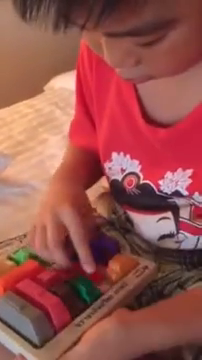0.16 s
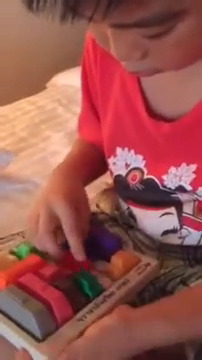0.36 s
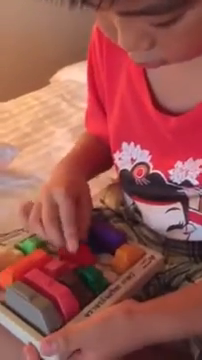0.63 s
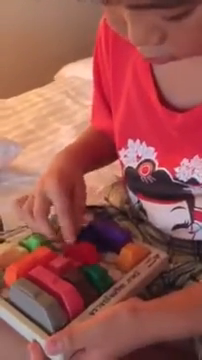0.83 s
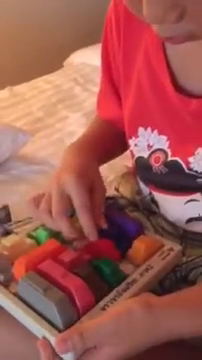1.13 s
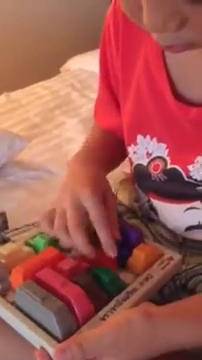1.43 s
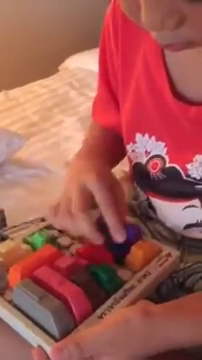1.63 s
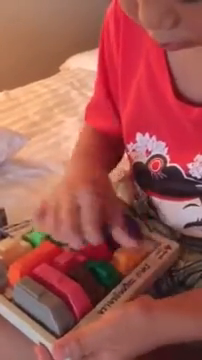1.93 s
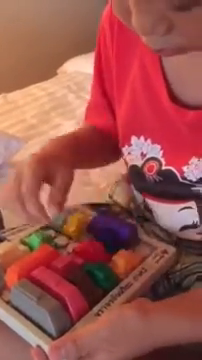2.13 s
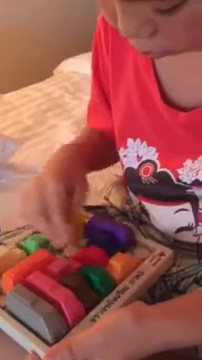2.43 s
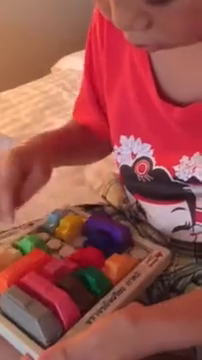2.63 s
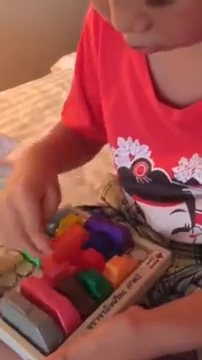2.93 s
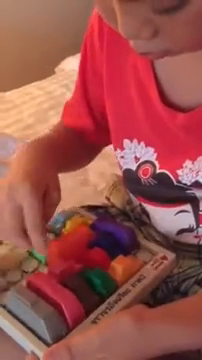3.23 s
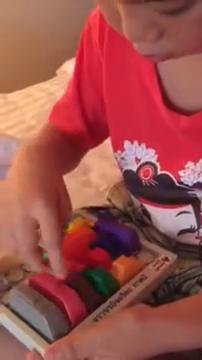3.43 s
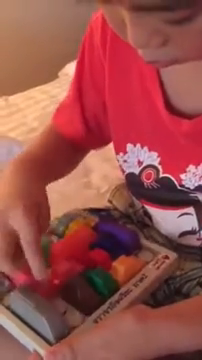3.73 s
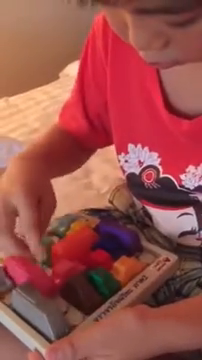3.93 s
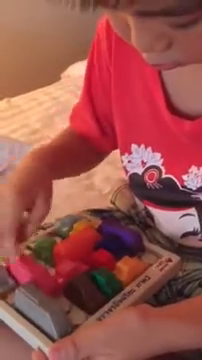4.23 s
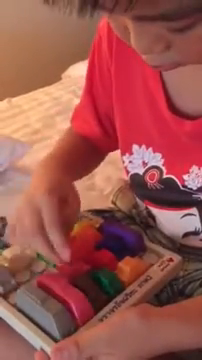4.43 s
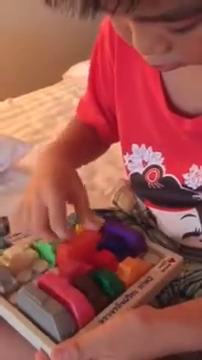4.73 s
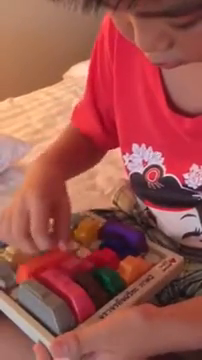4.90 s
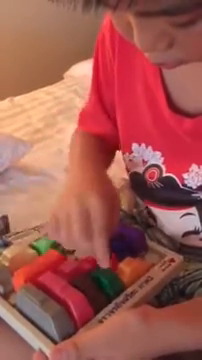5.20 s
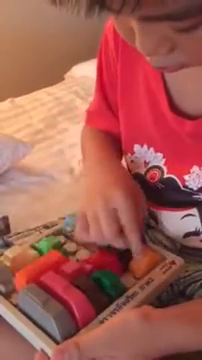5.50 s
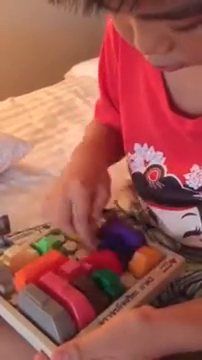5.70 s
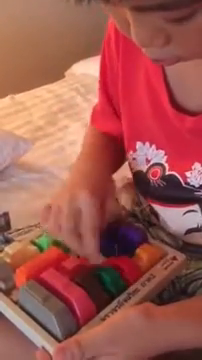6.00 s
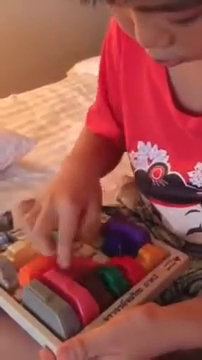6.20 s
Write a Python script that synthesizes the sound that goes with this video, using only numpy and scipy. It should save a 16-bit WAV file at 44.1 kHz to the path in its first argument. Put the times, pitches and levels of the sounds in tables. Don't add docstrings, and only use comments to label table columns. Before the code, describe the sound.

Plastic puzzle pieces rub and tap against one another and their plastic tray, quiet at first, then in sharp double and triple clacks around two, three and four seconds, with more busy rattling near five. Close phone pickup, small bedroom with brief echo. A muffled engine drone wavers late and rises in pitch, beside steady soft air-conditioner noise.

```python
import sys
import numpy as np
from scipy import signal
from scipy.fft import rfft, irfft
from scipy.io import wavfile
from scipy.ndimage import uniform_filter1d

SR = 44100
rng = np.random.default_rng(int(sys.argv[2]) if len(sys.argv) > 2 else 0)


def pcm_store(signal):
    levels = np.round(np.clip(np.atleast_2d(signal), -1, 1) * 32767)
    wavfile.write(sys.argv[1], SR, levels.astype(np.int16).T)


def magnitude_from_level(level_db):
    exponent = np.asarray(level_db, float) / 20
    return 10 ** exponent


N = 280035

# f/Hz, level/dB
MOTOR_LINES = [(95.5, -48.5)]
# f/Hz, level per Hz/dB
AIR_SPECTRUM = [(120, -26), (200, -6.5), (350, -14.5), (550, -18.5), (1000, -18), (2000, -21),
                (3200, -32.5), (5000, -34.5), (10000, -40.5), (14500, -42), (16000, -56.5)]
AIR_DB = -63.5

# t/s, firing rate/Hz, load/dB
ENGINE_COURSE = [(0, 51.41, 0.5), (1.1, 52.93, 2), (1.45, 54.21, 0), (1.68, 55.27, 4), (1.85, 57.32, -6.5),
                 (2.3, 57.86, 1.5), (3.3, 57.68, -3), (4.16, 57.16, -0.5), (4.25, 55.98, -16),
                 (4.68, 38.25, -1), (4.85, 44.78, -3.5), (4.98, 40.55, -2.5), (5.12, 49.83, 2.5),
                 (5.32, 41.98, -2.5), (5.48, 52.36, 1.5), (5.72, 53.26, 3), (5.86, 58.72, 1),
                 (6.16, 58.5, 2), (6.23, 65.1, -4.5)]
# t/s, depth/dB, width/s
CLUTCH_LULLS = [
    (4.579, -18.5, 0.13),
    (4.91, -12, 0.066),
    (5.08, -5.5, 0.043),
    (5.29, -13, 0.078),
    (5.67, -4.5, 0.059),
]
# f/Hz, level/dB
WALL_TRANSMISSION = [(42, -58.5), (52, -60), (58, -48.5), (85, -35), (104, -45), (116, -33.5), (152, -41.5),
                     (173, -56)]
# order/quarters of the firing rate, level/dB
CYLINDER_LINES = [(5, -5.5), (6, -4), (7, -1.5), (9, -6), (10, -4.5), (11, -2), (14, -12), (16, -19)]
UNEVEN_DB, UNEVEN_PER_DB, UNEVEN_PER_HZ = -52.5, 0.5, -0.18
# f/Hz, level per Hz/dB
RUMBLE_SPECTRUM = [(20, -17), (40, -8.5), (65, -13.5), (100, -5), (160, 5.5), (210, -6.5), (300, -26),
                   (450, -55.5)]
RUMBLE_DB = -49
# t/s, level/dB
TYRE_ROAR = [
    (0, -72),
    (.45, -82),
    (.7, -77.5),
    (5.8, -75.5),
    (6.1, -67),
    (6.35, -53),
]

# f/Hz, t60/s
ROOM_DECAY = [(500, 0.26), (1000, 0.45), (2000, 0.47), (4000, 0.32), (8000, 0.27), (13000, 0.16)]
ROOM_DB = -10
SCATTER_PER_S, STRAIGHT = 900, 0.38

# f/Hz, t60/s, level/dB
TRAY_MODES = [(1141.7, 0.0037, 5), (1446, 0.0083, -3.5), (1830, 0.038, -10.5), (2050, 0.11, 0.5),
              (2350, 0.031, -8), (2876, 0.031, -4.5), (3550, 0.0052, -6.5), (4140, 0.0087, -2),
              (4470, 0.08, 2.5)]
# f/Hz, level per Hz/dB
CONTACT_SPECTRUM = [(150, -52.5), (260, -40), (750, -25.5), (1100, -2.5), (1700, -2.5), (2500, 5.5),
                    (4200, 2), (5200, -0.5), (8000, -7), (13700, -10), (16000, -14.5)]
# t/s, peak level/dB, brightness/dB, 20 dB swell/s, 20 dB fade/s
SLIDE_STROKES = [(.025, -48.5, 0, 0.062, 0.23), (.2, -55.5, 8.5, 0.31, 0.36), (.34, -47.5, 3, 0.12, 0.12),
                 (.5, -64.5, 9.5, 0.25, 0.15), (.72, -62, 8, 0.15, 0.048), (1.02, -56.5, 3, 0.11, 0.11),
                 (1.52, -71, -9, 0.17, .35), (1.999, -69.5, 6, 0.29, .22), (2.48, -61.5, -0.5, .1, 0.11),
                 (3.821, -57.5, -2, 0.24, 0.098), (4.66, -70, -4, .3, .2), (4.97, -55.5, -2.5, 0.28, 0.2),
                 (5.09, -59, 1, 0.14, 0.072), (5.62, -80, -3, .18, 0.18), (6.04, -61, -12, .3, 0.036),
                 (6.33, -66, 0, 0.24, .2)]

# t/s, peak level/dB, hollow note f/Hz, rise/ms, fall/ms
HARD_SET_DOWNS = [(1.9006, -26.5, 2768, 1.9, 5.1), (1.919, -24.5, 2330, 1.2, 2.3),
                  (1.9502, -27, 2795, 5, 5.3), (1.955, -16, 2598, .4, 3.9),
                  (2.3787, -18.5, 4060, 0.26, 6.3), (2.3884, -14.5, 2305, 2.1, 2.2),
                  (2.8997, -19.5, 1630, 1.1, 2.3), (2.9449, -16, 1830, 4.3, 6.5),
                  (2.9576, -23.5, 1807, 3.4, 8.5), (2.9842, -20, 2555, 2.5, 4),
                  (3.0068, -6.5, 2000, 1.4, 1.4), (3.7231, -17.5, 2210, 0.78, 9),
                  (3.7294, -25.5, 1890, 5.5, 1.4), (3.7389, -25, 2156, 4.6, 5.9),
                  (3.7482, -24.5, 2150, 5.3, 1.9), (3.7565, -12.5, 1905, .67, 6.4),
                  (4.3175, -18, 2350, 3, 6.9), (4.3639, -20, 2007, 1.1, 11), (4.4027, -8.5, 3980, 1.7, 1.3),
                  (4.8899, -16.5, 3140, 0.44, 6.9), (4.938, -21.5, 2470, .6, 8.1),
                  (5.463, -19, 2900, 1.3, 3), (5.4952, -20.5, 3180, 0.33, 3.6),
                  (5.4997, -14, 3620, 2.7, 1.8)]
# t/s, peak level/dB, hollow note f/Hz, fall/ms
EDGE_TAPS = [(.0499, -32.5, 2140, 1.8), (.19, -42.5, 2330, 5.6), (.2883, -29.5, 2600, 2.4),
             (.389, -36, 2100, 2.6), (.4384, -44, 2300, 3.2), (.6574, -37, 1260, 2.7),
             (.7184, -40, 2760, 3.1), (.7475, -40.5, 2210, 1.3), (1.2951, -37.5, 2210, 4.1),
             (1.3169, -41, 2800, 2.5), (1.352, -28, 2830, 7.3), (1.412, -34.5, 4450, 2.2),
             (1.6105, -38, 2600, 2.1), (1.8871, -30.5, 3200, 6.1), (2.0731, -40, 2470, 5.6),
             (2.4761, -35, 2620, 3.9), (3.6877, -33, 2620, 3.8), (4.8055, -31, 2240, 2.9),
             (4.8121, -25, 2220, 6), (4.8818, -21.5, 1900, 1.6), (4.918, -26.5, 1900, 2.9),
             (5.146, -32, 2380, 5.6), (5.4126, -31, 2420, 3.7), (5.4234, -27.5, 2640, 3.9),
             (5.4477, -34, 2230, 3.1), (5.643, -37, 4260, 3.4), (5.8885, -24.5, 2980, 5.9),
             (5.9346, -25.5, 2600, 15), (6.1505, -37, 2400, 2.9), (6.2163, -36, 4650, 5.3)]
# t/s, peak level/dB, hollow note f/Hz, fall/ms
GLANCING_SCUFFS = [(0.0207, -40.5, 1660, 6), (.6386, -35.5, 4420, 2), (0.6478, -37, 2060, 1.6),
                   (.6956, -29.5, 3000, 1.6), (.7315, -37.5, 2580, 3.8), (0.9887, -38, 4300, 3.9),
                   (1.3254, -34.5, 2740, 1.6), (1.3758, -29, 4580, 3.1), (1.4888, -39.5, 3020, 2.1),
                   (1.588, -31, 2105, 1.5), (1.6561, -41, 2720, 4), (1.8542, -32.5, 2230, 7.1),
                   (2.0493, -35.5, 2600, 8.9), (2.3677, -35, 3030, 17), (2.9749, -21, 1830, 19),
                   (3.6993, -32, 2270, 19), (3.965, -35.5, 2660, 0.96), (4.3591, -24.5, 2020, 0.52),
                   (4.3784, -27.5, 2500, 5.1), (4.42, -24, 2300, 17), (4.8641, -32.5, 2460, 8.8),
                   (4.903, -30, 2850, 4.4), (4.959, -25.5, 3670, 1.2), (5.3189, -42.5, 2680, 8.3),
                   (5.6695, -43.5, 2800, 1), (5.883, -35, 3000, 2.5), (5.9451, -23.5, 4020, 4.8),
                   (5.9802, -31.5, 4680, 10.3), (5.9963, -47, 4500, .6), (6.0256, -34.5, 4720, 5)]
# t/s, peak level/dB, hollow note f/Hz
NEIGHBOUR_TICKS = [(.0858, -54, 1830), (.165, -46, 1660), (.1989, -44, 2960), (.2363, -54, 2250),
                   (.7655, -48, 2360), (.9176, -44, 2250), (.9235, -48, 3210), (.9667, -41.5, 4670),
                   (.9797, -46, 4800), (1.0638, -49, 1650), (1.0809, -46, 3100), (1.4376, -44, 2320),
                   (1.5277, -50, 2110), (1.5405, -55, 2960), (1.5624, -55.5, 2260), (1.6208, -46.5, 4530),
                   (2.1095, -52.5, 2110), (2.5241, -45.5, 2980), (3.1222, -43, 2350), (3.1641, -49, 1960),
                   (3.6362, -48, 2090), (3.6558, -43.5, 1890), (4.7983, -41, 3570), (5.0623, -42.5, 2800),
                   (5.071, -49, 2190), (5.1386, -45, 2980), (5.3569, -43, 4080), (5.8486, -42, 2760),
                   (5.874, -34, 2670), (6.3334, -44.5, 2520)]
TAP_RISE_MS, SCUFF_RISE_MS, TICK_RISE_MS, TICK_FALL_MS = 1.3, 3.9, 1.8, 2.7
BRIGHT_DB, BRIGHT_PER_DB = -19, 0.404
SOFT_DB, HARD_DB = -45.5, -13.5
SHARED_NOTE_DB, SHARED_SPAN = 12.5, 0.035


def unit(x):
    return x / np.sqrt(np.mean(x ** 2))


def colour(x, points, tilt_db=0.):
    hz = np.maximum(np.fft.rfftfreq(len(x), 1 / SR), 1)
    f, db = np.transpose(points)
    lift = tilt_db * np.clip(np.log2(hz / 3500), 0, 1)
    gain = magnitude_from_level(np.interp(np.log(hz), np.log(f), db) + lift)
    return irfft(rfft(x) * gain, len(x))


def ring(hz, t60, db, size=4096):
    t = np.arange(size)[:, None] / SR
    fall = np.log(1000) / np.asarray(t60)
    modes = np.exp(-fall * t) * np.sin(2 * np.pi * np.asarray(hz) * t)
    return (magnitude_from_level(db) * np.sqrt(fall / 200) * modes).sum(axis=1)


def walk(rate):
    k = int(SR / rate)
    held = np.repeat(rng.standard_normal(N // k + 1), k)
    return unit(uniform_filter1d(uniform_filter1d(held, k), k)[:N])


def curves(table):
    s, *columns = np.transpose(table)
    return [np.interp(np.arange(N) / SR, s, c) for c in columns]


def air_conditioner():
    hum = 0
    for hz, db in MOTOR_LINES:
        phase = 2 * np.pi * np.cumsum(hz + 0.3 * walk(2.5)) / SR
        hum = hum + magnitude_from_level(db + 1.2 * walk(3)) * np.sin(phase)
    hiss = unit(colour(rng.standard_normal(N), AIR_SPECTRUM))
    return np.sqrt(2) * hum + hiss * magnitude_from_level(AIR_DB + 1.1 * walk(6.2))


def engine_load():
    hz, load_db = curves(ENGINE_COURSE)
    t = np.arange(N) / SR
    for s, db, width in CLUTCH_LULLS:
        load_db = load_db + db * np.exp(-((t - s) / width) ** 2)
    return hz, load_db


def engine():
    hz, load_db = engine_load()
    turn = 2 * np.pi * np.cumsum(hz) / SR
    wall_hz, wall_db = np.transpose(WALL_TRANSMISSION)
    drone = 0
    for k in range(1, 4):
        db = load_db + np.interp(np.log(k * hz), np.log(wall_hz), wall_db)
        drone = drone + magnitude_from_level(db + 1.4 * walk(12)) * np.sin(k * turn)
    uneven_db = UNEVEN_DB + UNEVEN_PER_DB * load_db + UNEVEN_PER_HZ * (hz - 53)
    for quarters, db in CYLINDER_LINES:
        phase = quarters / 4 * turn + 6 * rng.random()
        drone = drone + magnitude_from_level(uneven_db + db + 0.52 * walk(9.9)) * np.sin(phase)
    rumble = unit(colour(rng.standard_normal(N), RUMBLE_SPECTRUM))
    rumble = rumble * magnitude_from_level(RUMBLE_DB + 0.6 * (uneven_db + 52))
    window = signal.butter(2, [300, 1300], "band", fs=SR, output="sos")
    roar = unit(signal.sosfilt(window, rng.standard_normal(N)))
    return np.sqrt(2) * drone + rumble + roar * magnitude_from_level(curves(TYRE_ROAR)[0] + 3.7 * walk(12))


def room(x):
    t, tail = np.arange(SR // 2) / SR, 0
    for hz, t60 in ROOM_DECAY:
        band = signal.butter(2, [hz / 1.38, min(hz * 1.344, 20000)], "band", fs=SR, output="sos")
        walls = magnitude_from_level(-60 * t / t60)
        bedding = 4 * magnitude_from_level(4.0 - 60 * t / (0.19 * t60))
        tail = tail + signal.sosfilt(band, rng.standard_normal(len(t))) * (walls + bedding)
    tail = tail * (1 - np.exp(-t / 0.004))
    scattered = x * unit(STRAIGHT + walk(SCATTER_PER_S))
    return signal.fftconvolve(scattered, tail / np.sqrt(np.sum(tail ** 2)))[:N]


def strokes():
    t, body, top = np.arange(N) / SR, 0, 0
    for s, db, bright_db, swell, fade in SLIDE_STROKES:
        gain = magnitude_from_level(db - 20 * np.where(t < s, (s - t) / swell, (t - s) / fade))
        body = body + gain
        top = top + gain * magnitude_from_level(bright_db)
    return body, top


def slide():
    slip_db = 2.2 * rng.exponential(size=N) + 4.5 * walk(45) + 2.5 * walk(250)
    slips = rng.standard_normal(N) * magnitude_from_level(slip_db)
    rasp = unit(colour(slips, CONTACT_SPECTRUM))
    top = signal.sosfilt(signal.butter(2, 6000, "high", fs=SR, output="sos"), rasp)
    tray = unit(signal.fftconvolve(slips, ring(*np.transpose(TRAY_MODES)))[:N])
    body_gain, top_gain = strokes()
    return body_gain * (rasp - top + magnitude_from_level(-7.5) * tray) + top_gain * top


def blows():
    rows = list(HARD_SET_DOWNS)
    rows += [(s, db, hz, TAP_RISE_MS, fall) for s, db, hz, fall in EDGE_TAPS]
    rows += [(s, db, hz, SCUFF_RISE_MS, fall) for s, db, hz, fall in GLANCING_SCUFFS]
    rows += [(s, db, hz, TICK_RISE_MS, TICK_FALL_MS) for s, db, hz in NEIGHBOUR_TICKS]
    out = []
    for s, db, hz, rise, fall in rows:
        bright_db = BRIGHT_DB + BRIGHT_PER_DB * (np.clip(db, SOFT_DB, HARD_DB) - SOFT_DB)
        out.append((s, db, hz, bright_db, rise, fall))
    return out


def edge_chatter(rise_ms, fall_ms):
    t = (np.arange(2048) - 512) / SR
    length = np.where(t < 0, np.minimum(rise_ms, 6), 0.97 * fall_ms)
    length = np.clip(length, 0.3, 12) / 1000
    envelope = magnitude_from_level(-6 * np.abs(t / length) ** np.where(t < 0, 1.9, 1.1))
    return rng.standard_normal(2048) * magnitude_from_level(1.5 * rng.exponential(size=2048)) * envelope


def piece_and_tray(note_hz):
    piece = ring(note_hz * np.array([0.9, 1, 1.09]), [0.011, 0.015, 0.011], [-1.5, 1.5, -1.5])
    tray_hz, tray_t60, tray_db = np.transpose(TRAY_MODES)
    shared_db = SHARED_NOTE_DB * np.exp(-(np.log(tray_hz / note_hz) / SHARED_SPAN) ** 2)
    detune, reach = rng.standard_normal((2, len(TRAY_MODES)))
    tray = ring(tray_hz * (1 + 0.01 * detune), tray_t60, tray_db + shared_db + 3 * reach - 7)
    return piece + tray


def knocks():
    out = np.zeros(N + 8192)
    thin = signal.butter(3, 1100, "high", fs=SR, output="sos")
    lap = ring([340, 560], [0.025, 0.025], [-1.5, -2.5])
    for s, db, note_hz, bright_db, rise_ms, fall_ms in blows():
        chatter = edge_chatter(rise_ms, fall_ms)
        size = np.sqrt(np.clip(note_hz, 1700, 3200) / 2400)
        spectrum = np.multiply(CONTACT_SPECTRUM, [size, 1])
        crack = colour(np.pad(chatter, (0, 2048)), spectrum, bright_db + 11)
        notes = signal.fftconvolve(chatter, piece_and_tray(note_hz))[:4096]
        notes = signal.sosfilt(thin, notes)
        thud = signal.fftconvolve(chatter, lap)[:4096]
        hit = unit(crack) + magnitude_from_level(-6.5) * unit(notes) + magnitude_from_level(-31.5) * unit(thud)
        power = uniform_filter1d(hit ** 2, size=110)
        at = int(s * SR)
        out[at:at + 4096] += hit / np.sqrt(power.max()) * magnitude_from_level(db + 1.0)
    return out[512:N + 512]


def scene():
    play = knocks() + slide()
    mix = play + magnitude_from_level(ROOM_DB) * room(play) + engine() + air_conditioner()
    return mix[None]


def band_limit(x):
    return signal.sosfilt(signal.butter(12, 16480, fs=SR, output="sos"), x)


def record(dry):
    shelf = signal.ellip(8, 0.1, 40, 15250, fs=SR, output="sos")
    edge = signal.ellip(8, 0.2, 70, 16500, fs=SR, output="sos")
    x = np.tanh(1.2 * dry) / 1.2
    x = signal.sosfiltfilt(shelf, x) + magnitude_from_level(-30.5) * x
    mix = signal.sosfiltfilt(edge, x)
    return band_limit(mix)


dry = scene()
out = record(dry)
pcm_store(out)
```